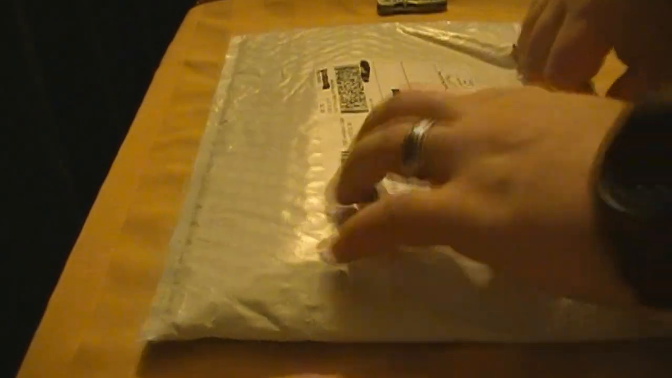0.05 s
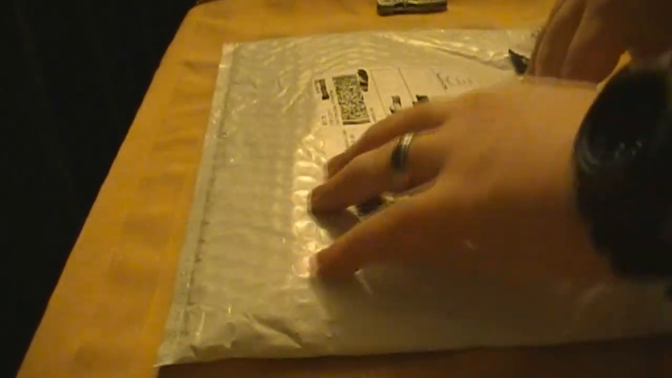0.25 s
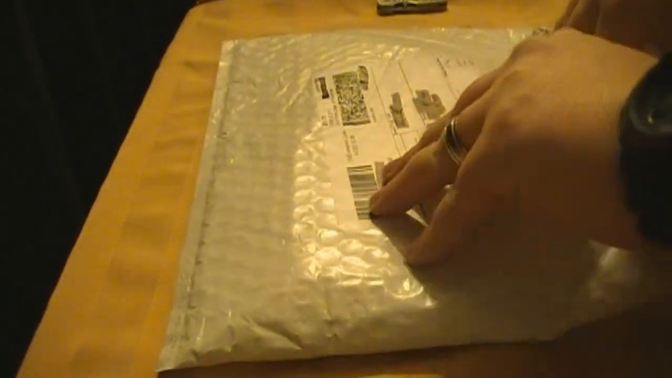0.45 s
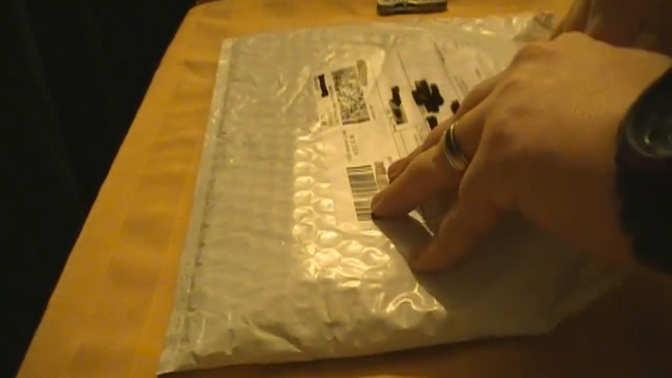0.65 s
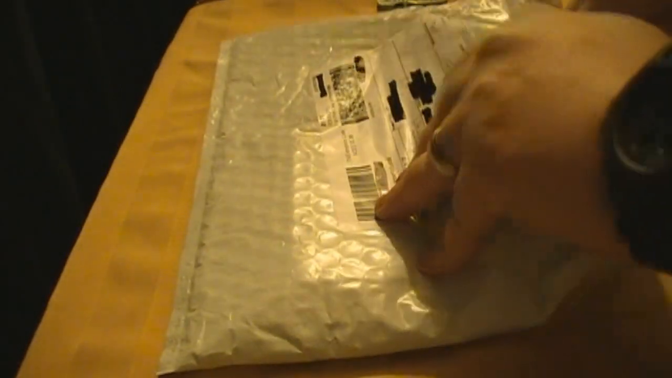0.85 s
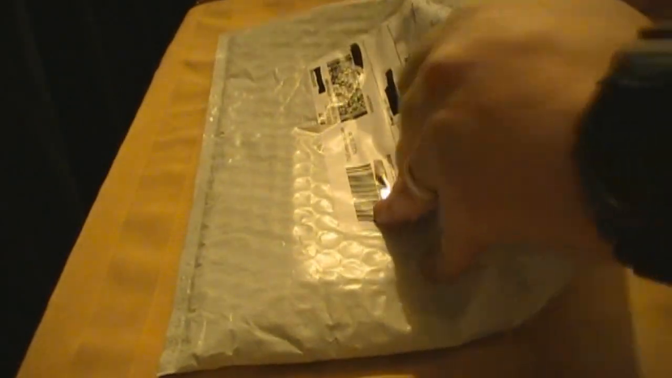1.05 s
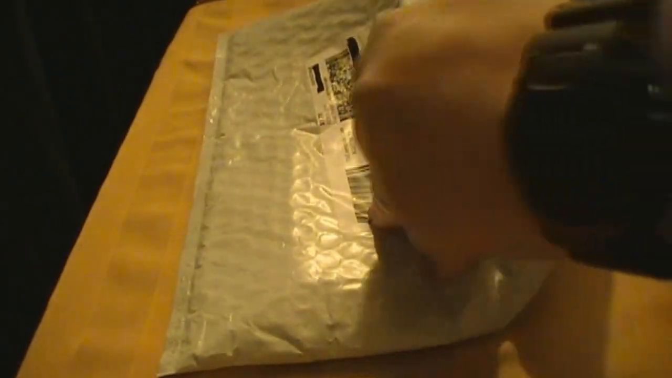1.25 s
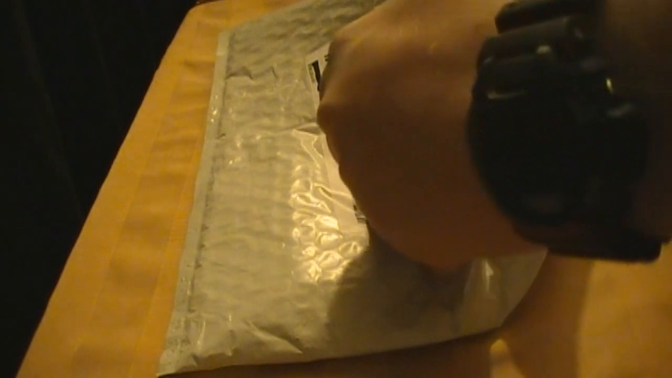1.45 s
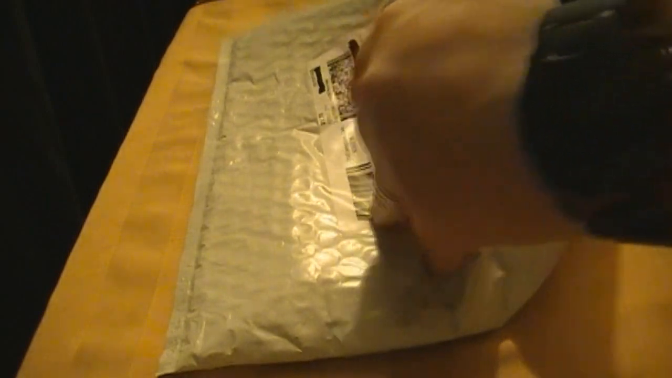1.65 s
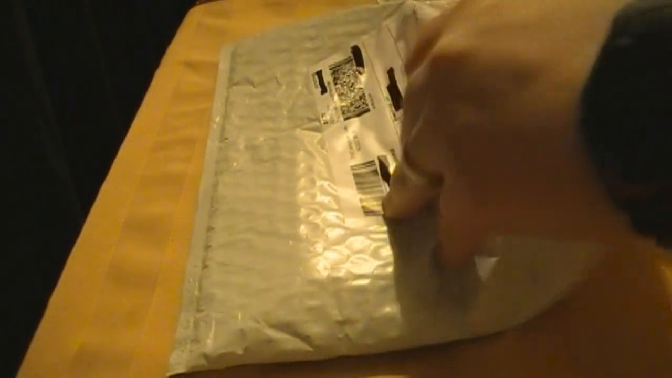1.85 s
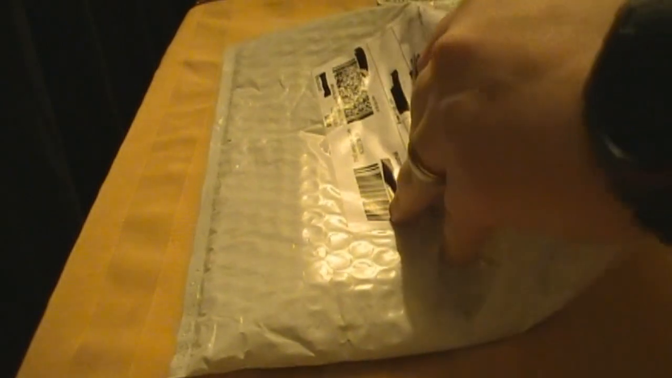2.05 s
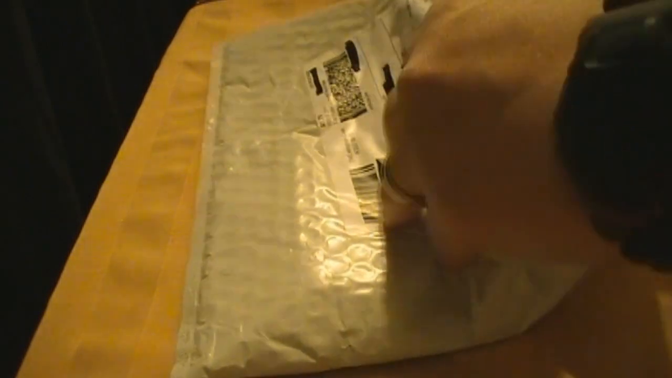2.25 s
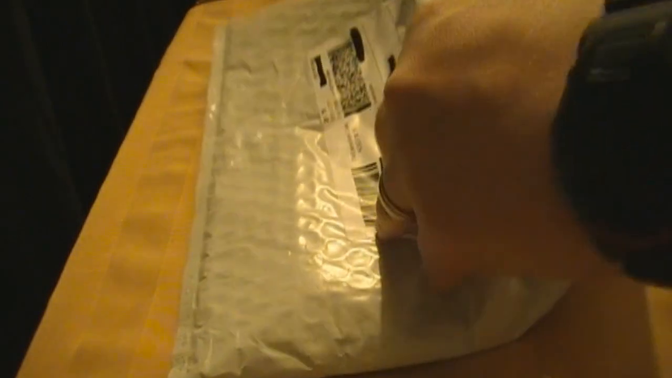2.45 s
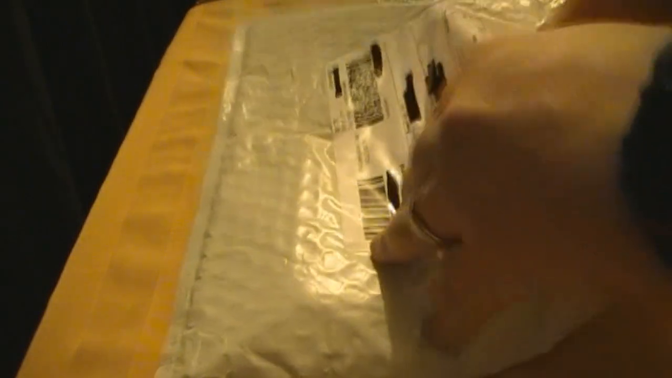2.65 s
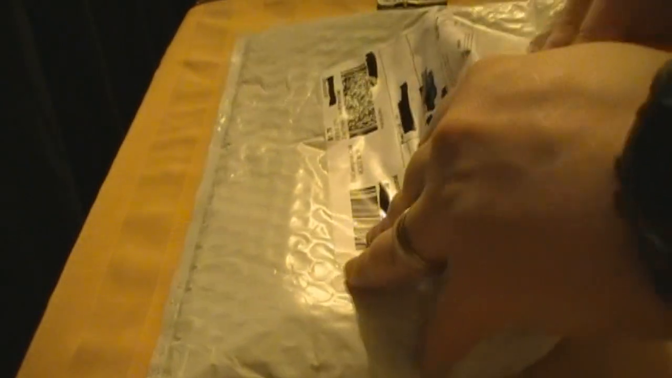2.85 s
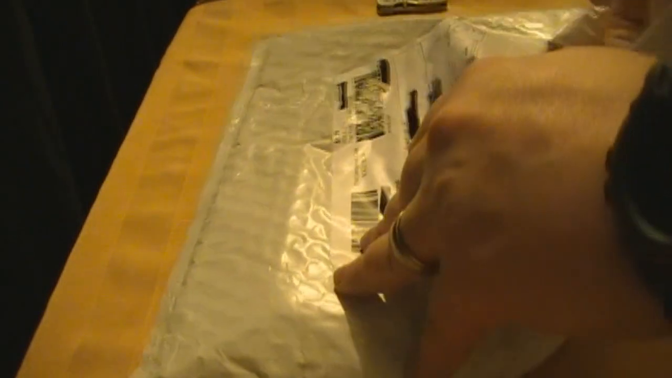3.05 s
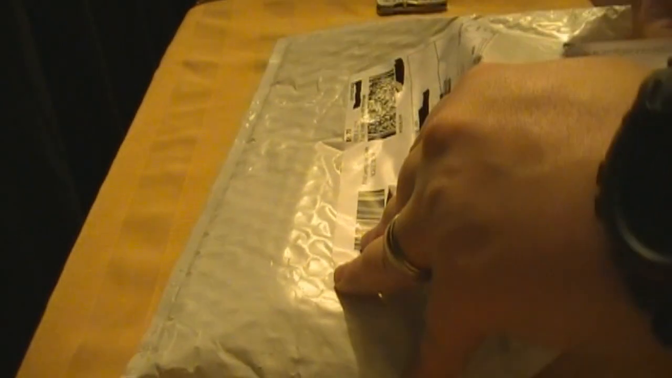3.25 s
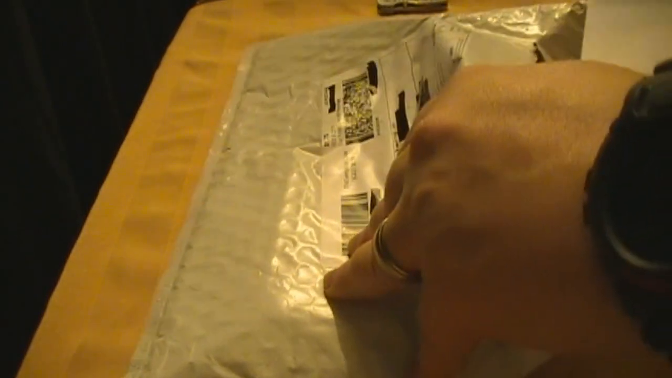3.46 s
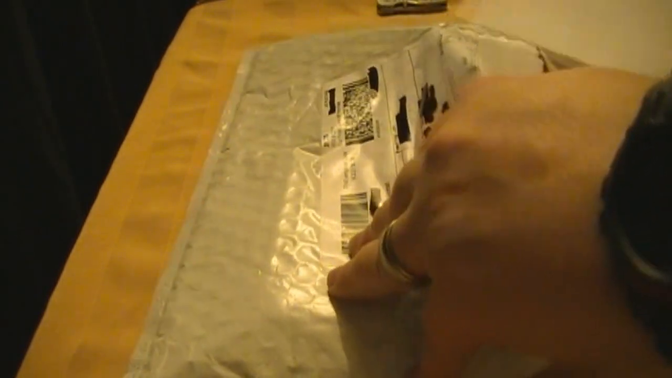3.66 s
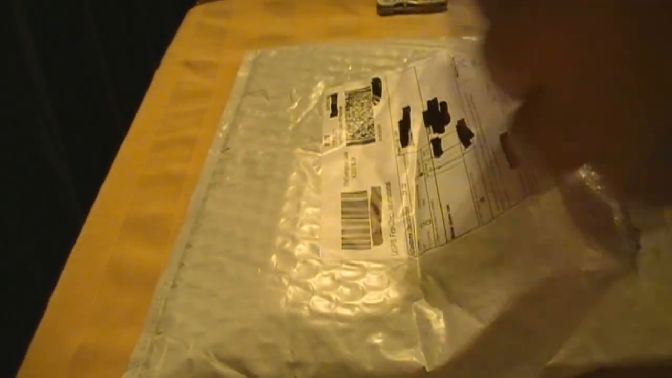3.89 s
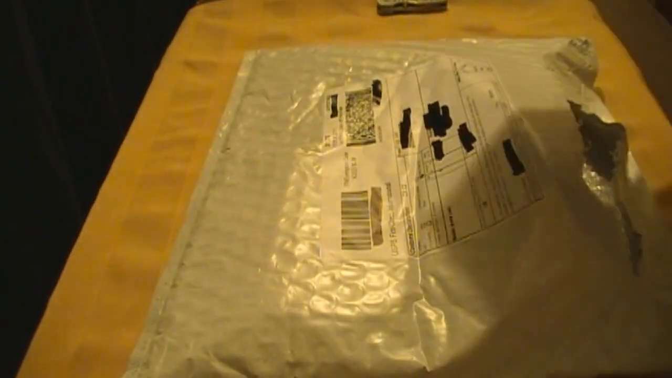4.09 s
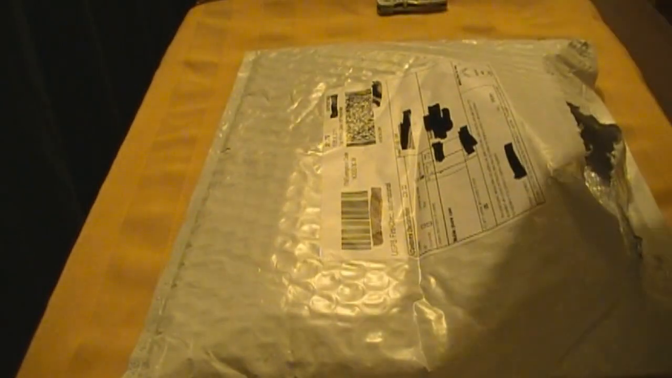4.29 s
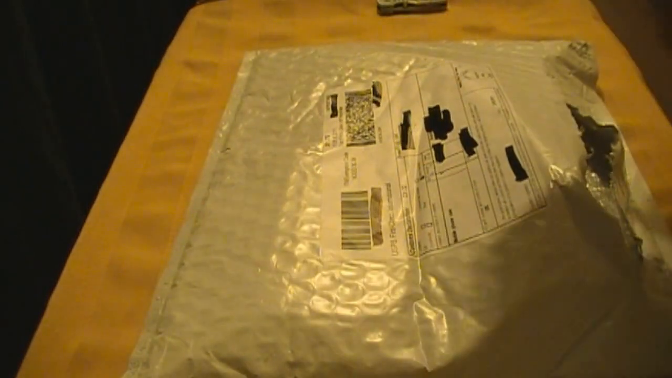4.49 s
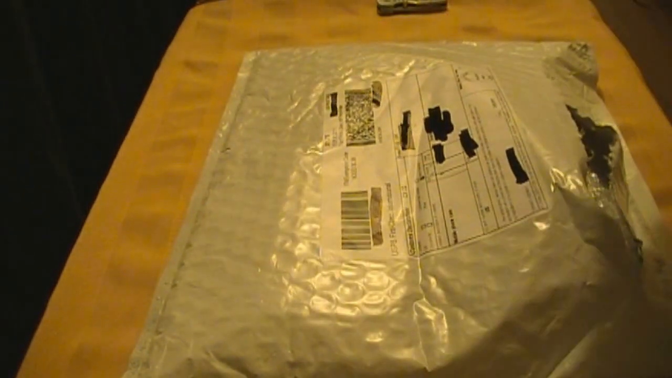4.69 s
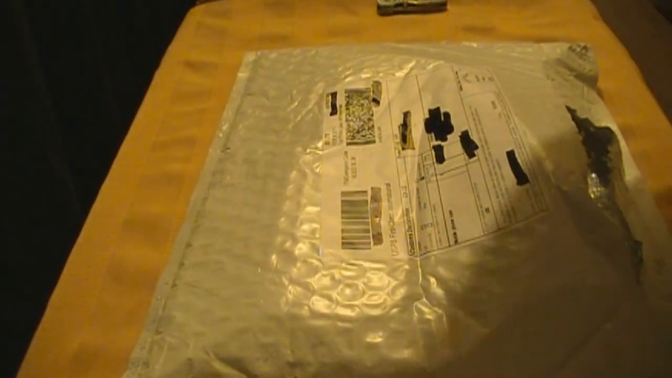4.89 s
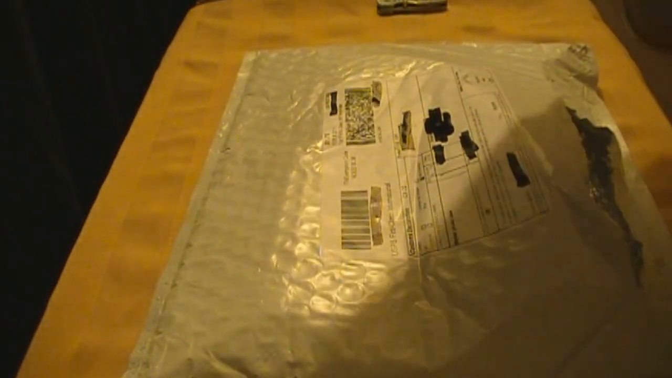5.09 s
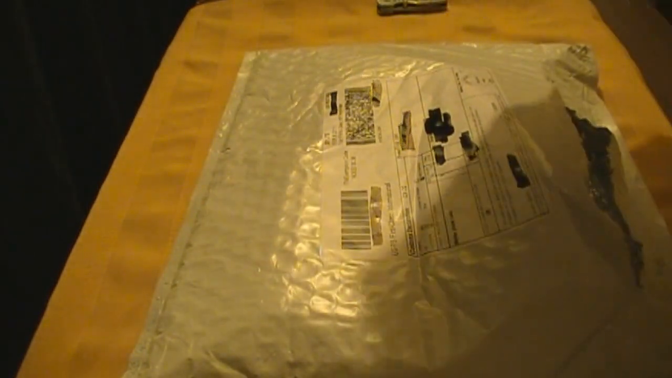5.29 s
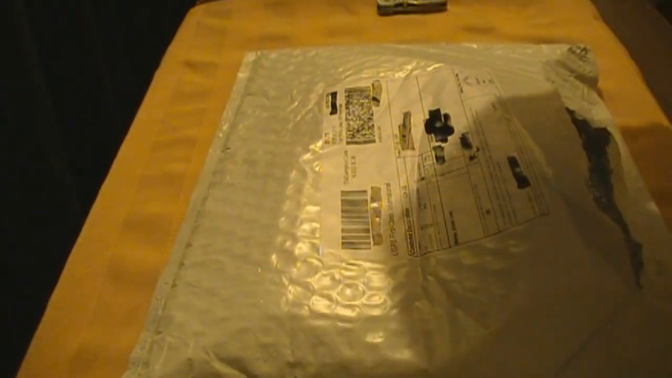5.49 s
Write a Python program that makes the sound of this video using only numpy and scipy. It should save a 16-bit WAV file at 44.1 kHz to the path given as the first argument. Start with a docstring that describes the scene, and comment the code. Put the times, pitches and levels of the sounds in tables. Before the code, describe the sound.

Close to the microphone, hands work open a padded plastic mailer lying on a table. From the start there is light, bright crinkling, then a tight flurry of crisp snaps around 0.25-0.8 seconds, with a very brief lull near 0.57. From about 0.8 to 2 seconds duller pouch thumps and small knocks through the table join the crackle. Between 2.2 and 3.5 seconds it is fullest: hard, sharp pops and longer crunchy crinkles, with tiny bubble pops buried in the uneven clumps. More creases give way towards 4 seconds, and a dense cluster of mid-pitched crackles runs from about 4.05 to 4.4 as the hands let go. After that the film relaxes: softer crackle, sparse faint ticks and thin high clicks until the end at about 5.5 seconds. The room is dry with a short dull tail; faint hiss and low mains hum remain underneath.

```python
"""Creases in the film of a plastic bubble mailer snap through as hands pull it open on a table, near a microphone.
Each snap is a short run of slips that strikes the damped modes of the pouch, its panels and its sharp edges.
Countless small creases crackle in clumps under the hands, with single bubbles popping among them;
from four seconds on, as the hands let go, ticks are fainter and clumps gentler.
The table adds a dull thud and the quiet room a short tail; mains hum and coloured hiss lie below."""
import sys
import numpy as np
from scipy import signal
from scipy.fft import rfft, irfft, next_fast_len
from scipy.io import wavfile
from scipy.ndimage import uniform_filter1d

SR = 44100
rng = np.random.default_rng(int(sys.argv[2]) if len(sys.argv) > 2 else 0)


def to_wav(sig):
    """Store sig (one row per channel, or 1-D mono) as 16-bit WAV at the path in sys.argv[1].

    Samples outside -1..1 are clipped; the rate is SR.
    """
    pcm = np.clip(np.atleast_2d(sig), -1, 1) * 32767
    pcm = np.round(pcm).astype(np.int16)
    wavfile.write(sys.argv[1], SR, pcm.T)  # frames by channels


N = 243991  # samples

POUCH_TOP_HZ, PANEL_HZ, EDGE_LOW_HZ = 850, [680, 6400], 5660
# dB of the buckling patch over the modes of pouch, panel and edge; cycles it takes to fall by 60 dB
PATCH_DB, PATCH_CYCLES = [0.5, -4.5, -8], 9
KNOCK_DB = [2, -9.5, -9]  # first give against the whole run of slips, for pouch, panel and edge

# Resonances of the mailer: closed pouch, film panels, sharp edges.
# Each row: frequency in Hz, relative level in dB, time to decay by 60 dB in seconds.
POUCH_MODES = [(325, 2.5, 0.022), (430, -2.5, 0.045), (527, -6, 0.0038), (690, 13, 0.0052)]
PANEL_MODES = [(800, 18.1, 0.0016), (1420, 21.3, 0.0044), (1930, 16.6, 0.00048), (1900, 20, 0.0057),
               (2700, 29.6, 0.00041), (3980, 14.7, 0.00022)]
EDGE_MODES = [(5070, -0.5, 0.00042), (8200, 2.5, 0.0011), (9530, 2, 0.0032), (10560, 7, 0.0011),
              (10900, -7, 0.0002), (14960, 6.5, 0.0015)]
# Loud creases snapping through. Each row: start in seconds, pouch thump in dB, panel knock in dB,
# sharp edge in dB, nominal length in ms, pitch of the buckling patch in Hz.
CREASE_SNAPS = [(0.075, -58, -30, -45, 1.3, 1400), (0.1022, -55, -33, -23.5, 5.8, 1430),
                (0.1417, -65, -37, -20, 0.56, 1480), (0.237, -54, -31, -50, 8.6, 720),
                (0.2607, -51, -25.5, -27, 6, 1980), (0.281, -54, -26, -16, 1.3, 1700),
                (0.2944, -44, -28, -37, 1.4, 1300), (0.3484, -60, -37, -37, 2.8, 3500),
                (0.362, -62, -19, -19, 0.44, 1450), (0.3779, -60, -45, -21, 0.45, 3500),
                (0.384, -62, -22.5, -21, 0.88, 4000), (0.39, -31, -23, -18, 1.3, 1790),
                (0.411, -53, -22.5, -37, 3.2, 1680), (0.427, -55, -23, -37, 1.1, 2700),
                (0.4434, -35, -18, -37, 2.4, 2270), (0.4477, -55, -28, -15, 2.9, 3000),
                (0.45, -56, -34, -22, 0.45, 1290), (0.497, -30.5, -19.5, -11.5, 0.73, 1320),
                (0.5617, -71, -41, -30, 0.82, 1690), (0.579, -38, -39, -23, 1.2, 2040),
                (0.5918, -43, -23.5, -13, 0.14, 1980), (0.6462, -42, -30.5, -22.5, 1.2, 1700),
                (0.678, -36, -32.5, -23, 3.7, 1310), (0.693, -44, -31.5, -22, 1.8, 1500),
                (0.7094, -68, -35, -20, 0.4, 1800), (0.732, -54, -24.5, -14, 0.19, 2500),
                (0.7884, -25, -42, -22, 2.1, 354), (0.7928, -49, -19, -16, 2.5, 2270),
                (0.815, -53, -27, -15, 0.47, 2060), (0.8666, -62, -52, -22.5, 0.67, 2060),
                (0.942, -28.5, -30.5, -28.5, 5.7, 566), (0.977, -55, -27, -14.5, 0.36, 1850),
                (1.015, -19.5, -21, -28, 1.2, 900), (1.034, -38, -31, -20.5, 0.38, 2200),
                (1.1171, -30, -24, -22, 2.8, 810), (1.1178, -24, -36, -45, 4.5, 350),
                (1.145, -30, -35, -15.5, 1.4, 900), (1.1596, -38, -24, -28, 1.3, 2180),
                (1.175, -28, -41, -50, 20, 700), (1.2034, -29.5, -25, -13.5, 0.5, 4600),
                (1.258, -25.5, -38, -55, 3.3, 1270), (1.3, -29, -24, -28, 1.3, 1660),
                (1.31, -28.5, -53, -18.5, 0.18, 1930), (1.318, -21, -15, -29, 0.14, 1420),
                (1.3253, -57, -38, -17, 0.12, 1690), (1.332, -57, -41, -19, 0.95, 3300),
                (1.373, -39, -31.5, -46, 2.6, 1440), (1.3785, -34.5, -37, -50, 2.7, 735),
                (1.4243, -62, -31.5, -30, 7.1, 1930), (1.484, -57, -48, -23.5, 0.46, 3030),
                (1.5858, -31.5, -23.5, -22, 0.98, 1270), (1.6616, -27, -25, -38, 3.2, 1880),
                (1.6774, -32.5, -29, -28.5, 7.5, 1900), (1.755, -35, -32, -23, 0.47, 2460),
                (1.7699, -28, -26.5, -30, 9, 1540), (1.8013, -29, -42, -53, 2.1, 810),
                (1.844, -26.5, -26, -57, 3.6, 2140), (2.052, -31, -21.5, -29, 12, 2100),
                (2.1656, -31.5, -20.5, -29, 3.4, 1940), (2.2592, -45, -31, -21, 0.71, 900),
                (2.264, -34.5, -15, -31, 1.4, 1490), (2.3406, -57, -20.5, -48, 2.6, 1550),
                (2.355, -32, -48, -13.5, 0.32, 1130), (2.4, -46, -32, -31, 1.7, 2500),
                (2.449, -18.5, -15.5, -15, 0.58, 640), (2.4789, -52, -20, -15, 0.99, 2500),
                (2.517, -40, -22.5, -24, 9.4, 3900), (2.577, -50, -24, -22, 1.8, 1620),
                (2.5926, -21, -17.5, -14.5, 1.7, 690), (2.598, -31, -23, -36, 9.7, 3800),
                (2.604, -36, -37, -13, 1.7, 1800), (2.623, -18.5, -18, -17.5, 6.4, 560),
                (2.674, -31, -16.5, -14, 0.17, 1380), (2.6999, -58, -25, -49, 0.23, 1370),
                (2.72, -29, -51, -50, 1.9, 765), (2.7984, -61, -16.5, -10, 0.42, 1370),
                (2.8188, -41, -29.5, -29, 13, 1570), (2.837, -56, -36, -32, 5.5, 1600),
                (2.908, -63, -38, -25, 0.47, 2060), (2.9355, -52, -30.5, -54, 0.62, 1370),
                (2.985, -24.5, -19.5, -16, 1.6, 680), (3.005, -39, -24, -45, 12.4, 880),
                (3.04, -29.5, -33, -38, 33, 990), (3.1223, -32, -24.5, -48, 4.6, 1530),
                (3.199, -48, -18.5, -11, 0.21, 1420), (3.205, -52, -20.5, -15.5, 4.1, 2050),
                (3.313, -34, -33.5, -35, 22, 1480), (3.347, -21.5, -22, -22, 8.7, 790),
                (3.3496, -16, -24, -34, 11.6, 370), (3.365, -32, -23.5, -33, 20, 3130),
                (3.377, -27, -19.5, -30, 5.7, 1950), (3.386, -33, -25.5, -50, 12, 826),
                (3.4634, -56, -17.5, -18, 0.27, 1930), (3.466, -44, -21.5, -29, 4.4, 3140),
                (3.6858, -29, -35, -40, 4.8, 390), (3.688, -29, -26, -29, 6, 795),
                (3.6964, -55, -27, -20, 1.2, 3980), (3.7267, -48, -29.5, -24, 1.3, 1900),
                (3.7489, -29, -28, -25, 6.2, 755), (3.792, -30, -23.5, -20, 0.62, 1350),
                (3.8888, -44, -29.5, -48, 1.4, 1250), (3.934, -34.5, -20.5, -19, 1.5, 2050),
                (3.991, -59, -42, -31, 12, 1210), (4.064, -22.5, -26, -42, 6.1, 430),
                (4.07, -33, -23, -27, 4, 1910), (4.0821, -32.5, -23, -42, 4.2, 2580),
                (4.105, -31, -30, -47, 6.1, 564), (4.113, -26, -29, -26, 4.6, 400),
                (4.1274, -36, -25, -34, 3.2, 1720), (4.138, -41, -18, -20.5, 2, 1760),
                (4.142, -26, -21, -44, 14.6, 1910), (4.175, -33, -33, -47, 15, 595),
                (4.201, -25.5, -25.5, -47, 12, 2400), (4.256, -42, -32, -43, 1.3, 1580),
                (4.2622, -48, -26, -29, 2.5, 1390), (4.2732, -57, -19, -27, 6, 1740),
                (4.327, -52, -38, -16, 8, 4140), (4.3354, -54, -28, -14, 2.3, 3820),
                (4.3413, -57, -19.5, -27, 5.7, 2870), (4.3569, -34, -21, -35, 1.8, 1830),
                (4.36, -37, -24.5, -47, 18.5, 1600), (4.372, -36, -33, -49, 3.3, 2200),
                (4.419, -38, -42.5, -52, 2, 1930), (4.447, -63, -63, -36, 0.61, 3500),
                (4.489, -42, -60, -55, 9.6, 560), (4.546, -64, -43, -37, 12, 3660),
                (4.632, -59, -45, -55, 2, 1300), (4.714, -40, -38.5, -41, 1.8, 1490),
                (4.7373, -44, -37, -28.5, 3.6, 3530), (4.7457, -54, -32.5, -54, 4.6, 1290),
                (4.759, -70, -60, -35, 0.37, 10500), (4.883, -64, -46, -45, 10, 3500),
                (4.905, -66, -49, -52, 9.6, 2100), (4.956, -70, -65, -32.5, 0.4, 10000),
                (4.974, -39.5, -54, -61, 15, 340), (5.072, -70, -39, -30.5, 0.63, 1970),
                (5.134, -49, -51, -60, 1.4, 900), (5.2701, -70, -70, -41, 0.59, 9600),
                (5.284, -70, -68, -35, 0.42, 10000), (5.289, -70, -66, -33, 0.82, 8500),
                (5.3504, -68, -68, -35, 0.18, 10500), (5.385, -69, -53, -64, 23, 1200),
                (5.454, -57, -41.5, -42, 3.6, 1820), (5.486, -65, -43, -36.5, 6.8, 2040),
                (5.4925, -65, -55, -28.5, 0.91, 1930)]


def snaps(spread_db, octave_db, rough_db, fade, rise, settle_db, settle_ms, strain_ms):
    """Snap-through buckling: a run of uneven slips swells, dies away and drives each mode with its own strength."""
    start_s, *levels, length_ms, patch_hz = np.transpose(CREASE_SNAPS)
    lead, grain = 400, 24  # samples before the snap, samples in a slip
    ms = (np.arange(2400) - lead) / SR * 1000
    through = fade * np.maximum(ms, 0) / np.clip(length_ms, .2, 20)[:, None]
    # the film strains faintly before it gives way and settles in small slips afterwards
    around = from_db(settle_db) * np.exp(-np.where(ms < 0, -ms / strain_ms, ms / settle_ms))
    around = around * np.sqrt(np.clip(length_ms / 4, 0, 1))[:, None]
    swell = through ** rise * np.exp(1 - through) + around
    out = np.zeros(N + len(ms))
    # a thump carries no treble, a panel knock stays in the middle, a sharp edge has no bass
    reach = [(POUCH_TOP_HZ, "low"), (PANEL_HZ, "band"), (EDGE_LOW_HZ, "high")]
    parts = zip((POUCH_MODES, PANEL_MODES, EDGE_MODES), levels, reach, PATCH_DB, KNOCK_DB)
    for modes, level_db, limit, patch_db, knock_db in parts:
        slips = swell * rng.standard_normal(swell.shape)
        slip_sizes = rng.standard_normal((len(start_s), len(ms) // grain))
        slips *= from_db(rough_db * np.repeat(slip_sizes, grain, axis=1))
        # the first give is a single strong click
        slips[:, lead] += from_db(knock_db) * np.sqrt(np.sum(slips ** 2, axis=1))
        # modes near the pitch of the buckling patch are driven hardest
        nearest_hz = np.minimum(patch_hz, modes[-1][0])[:, None]
        octaves = np.minimum(abs(np.log2(np.array(modes)[:, 0] / nearest_hz)), 1)
        strengths = from_db(spread_db * rng.standard_normal(octaves.shape) - octave_db * octaves)
        bursts = 0
        for k, (hz, db, t60) in enumerate(modes):
            bursts = bursts + strengths[:, [k]] * from_db(db) * ring(slips, hz, t60)
        patch = np.array([ring(slip, hz, PATCH_CYCLES / hz) for slip, hz in zip(slips, patch_hz)])
        patch = from_db(patch_db) * patch / patch.std(axis=1)[:, None]
        bursts = bursts / bursts.std(axis=1)[:, None] + patch
        bursts = signal.lfilter(*signal.butter(2, *limit, fs=SR), bursts)
        # set each burst by its loudest short stretch
        tops = np.sqrt(2 * uniform_filter1d(bursts ** 2, size=60, axis=1).max(axis=1))
        bursts = bursts * (from_db(level_db) / tops)[:, None]
        for at, burst in zip((start_s * SR).astype(int), bursts):
            out[at:at + len(ms)] += burst
    return out[lead:N + lead]


# once the hands let go the film relaxes with fainter ticks and gentler clumps
LET_GO_S, LET_GO_DB = 4, -12
# a loud crease stirs up the film around it: crackle swells before it and dies after it
STIR_LOW_DB, STIR_BRIGHT_DB, STIR_RISE_S, STIR_FALL_S = -13.5, -12, 0.0097, 0.015

# Crackle under the hands, gliding between rows.
# Each row: time in seconds, low crackle in dB, bright crackle in dB, before stirring is added.
HAND_CRACKLE = [(0.0, -44.5, -34.5), (0.13, -47.5, -39.5), (0.2, -51.5, -41.5), (0.27, -40.5, -36),
                (0.45, -53.5, -33.5), (0.57, -68, -54), (0.72, -54, -42), (1.09, -47.5, -44),
                (1.16, -52, -45), (1.44, -45, -37.5), (1.54, -52, -49), (1.7, -42.5, -42),
                (1.82, -47, -51.5), (1.89, -40.5, -36.5), (2.22, -44.5, -47), (2.66, -45, -41.5),
                (2.89, -48.5, -47), (3.2, -43, -38), (3.29, -46, -46), (3.5, -51, -57), (3.72, -46, -37.5),
                (3.99, -51, -47.5), (4.055, -57, -39), (4.24, -45.5, -57), (4.45, -50, -48),
                (4.58, -55.5, -40.5), (4.7, -52, -53), (4.81, -57.5, -49), (4.9, -52.5, -41),
                (4.98, -58, -52), (5.1, -60, -46), (5.22, -61, -56), (5.53, -59, -65)]
# The pouch joins in the low crackle as the hand presses down on it.
# Each row: time in seconds, gain of the lowest part of that crackle in dB.
POUCH_GAIN = [(0.5, -14), (1.15, 0.5), (4.4, 3.5)]


def handling():
    """Intermittent (jerky) crackling noise: low and bright crackle share clumps as the film gives way."""
    time_s, low_db, bright_db = np.transpose(HAND_CRACKLE)
    _, pouch_db, panel_db, edge_db, *_ = np.transpose(CREASE_SNAPS)
    t = np.arange(N) / SR
    slow_db = 1.65 * drift(17.4) * np.where(t > LET_GO_S, 0.6, 1)
    clumps = from_db(slow_db + 1.4 * drift(440.0))
    ticks = from_db(13.5 + LET_GO_DB * (t > LET_GO_S)) * creases(per_s=160.0, size_db=2.0)
    dull_ticks = from_db(-2.0) * creases(per_s=100., size_db=-3.5)

    low = crackle(POUCH_MODES + PANEL_MODES, clumps, 0.18 * ticks + dull_ticks,
                  per_s=1100., size_db=2.0, patchy_db=5.0, colour_db=3.5)
    low = low + from_db(POPS_DB) * clumps * pops()
    body = signal.sosfilt(signal.butter(2, PANEL_HZ[0], fs=SR, output="sos"), low)
    low = low + (from_db(np.interp(t, *np.transpose(POUCH_GAIN))) - 1) * body

    bright = crackle(EDGE_MODES, clumps, ticks, per_s=6600.0, size_db=4.5, patchy_db=0.5, colour_db=5.0)
    bright = signal.sosfilt(signal.butter(2, EDGE_LOW_HZ, "high", fs=SR, output="sos"), bright)

    strength_db = np.maximum(np.maximum(pouch_db, panel_db), edge_db)
    low_power = from_db(np.interp(t, time_s, low_db)) ** 2 + stirred(strength_db, STIR_LOW_DB)
    bright_power = from_db(np.interp(t, time_s, bright_db)) ** 2 + stirred(strength_db, STIR_BRIGHT_DB)
    return np.sqrt(low_power) * low + np.sqrt(bright_power) * bright


def crackle(modes, clumps, ticks, per_s, size_db, patchy_db, colour_db):
    """Modal excitation by random impulses: each mode has its own creases and its own share of common ticks."""
    out = 0
    for hz, db, t60 in modes:
        clicks = creases(per_s, size_db) + ticks * from_db(colour_db * rng.standard_normal(N))
        out = out + from_db(db + patchy_db * drift(33.7)) * ring(clicks * clumps, hz, t60)
    return rms_one(out)


def creases(per_s, size_db):
    """Random point process: clicks of either sign at chance moments, many small and a few large in dB size."""
    born = rng.random(N) < per_s / SR
    size = from_db(size_db * np.minimum(rng.exponential(1, N), 5))
    return born * size * rng.choice([-1, 1], N)


def stirred(level_db, share_db):
    """Energy sharing: crackle power rises and falls exponentially around each loud crease with its energy."""
    start_s, length_ms = np.transpose(CREASE_SNAPS)[[0, 4]]
    energy = np.full(N, 1e-18)
    crease_energy = from_db(level_db + share_db) ** 2 * length_ms / 1000
    np.add.at(energy, (start_s * SR).astype(int), crease_energy)
    before = signal.lfilter([1], [1, -np.exp(-1 / (STIR_RISE_S * SR))], energy[::-1])[::-1]
    after = signal.lfilter([1], [1, -np.exp(-1 / (STIR_FALL_S * SR))], energy)
    return (before + after - energy) / (STIR_RISE_S + STIR_FALL_S)


# single bubbles of the film give way: rate, pitch range, cycles to fall by 60 dB, level before clumping
POPS_PER_S, POPS_HZ, POPS_CYCLES, POPS_DB = 250., [900, 6500], 2.6, -12


def pops():
    """Impulse response of small resonators: clicks are dealt to sixteen short rings spread in pitch."""
    clicks, dealt = creases(POPS_PER_S, size_db=2.0), rng.integers(0, 16, N)
    out = 0
    for k, hz in enumerate(np.geomspace(*POPS_HZ, 16)):
        out = out + ring(clicks * (dealt == k), hz, POPS_CYCLES / hz) * hz / POPS_HZ[0]
    return rms_one(out)


ROOM_T60_S, ROOM_DB, ROOM_CUT_HZ = 0.13, -19, 2050


def room(x):
    """Reverberation: convolution with a dull, exponentially decaying tail of dense echoes after a short gap."""
    t = np.arange(SR // 3) / SR
    tail = rng.standard_normal(len(t)) * from_db(-60 * t / ROOM_T60_S) * (t > .003)
    tail = signal.lfilter(*signal.butter(1, ROOM_CUT_HZ, fs=SR), tail)
    return from_db(ROOM_DB) * signal.fftconvolve(x, tail / np.sqrt(np.sum(tail ** 2)))[:N]


HISS_DB = -59.5  # rms
HUM_HZ, HUM_DB = 120, -71.5  # mean frequency; rms level about which it wavers

# Spectrum of the room hiss. Each row: frequency in Hz, relative density in dB per Hz.
HISS_SPECTRUM = [(30, -11.5), (120, 1), (210, 3.5), (310, -6.5), (600, -10.5), (1500, -14), (1950, 0.5),
                 (3200, -11), (6400, -14.5), (10000, -17.5), (15000, -6)]


def background():
    """Stationary noise shaped in the spectrum, and a mains hum as a sine wavering in phase and level."""
    size = next_fast_len(N)
    hz, db = np.transpose(HISS_SPECTRUM)
    log_hz = np.log(np.fft.rfftfreq(size, 1 / SR) + 1)
    colour = from_db(np.interp(log_hz, np.log(hz), db))
    hiss = rms_one(irfft(rfft(rng.standard_normal(size)) * colour, size)[:N])
    hum = np.sqrt(2) * np.sin(2 * np.pi * HUM_HZ * np.arange(N) / SR + 0.83 * drift(0.53))
    return from_db(HISS_DB) * hiss + from_db(HUM_DB + 1.8 * drift(2.8)) * hum


def ring(clicks, hz, t60):
    """Damped resonance: a two-pole mode; white noise comes out at much the same level whatever the decay."""
    r, w = from_db(-60 / (t60 * SR)), 2 * np.pi * hz / SR
    driven = signal.lfilter([1, 0, -1], [1, -2 * r * np.cos(w), r * r], clicks + 1e-18)
    return np.sqrt(1 - r) * driven / np.sin(w)


def drift(rate_hz):
    """Slow random modulation: noise through a double one-pole low-pass, run in for a second; rms 1."""
    r = np.exp(-2 * np.pi * rate_hz / SR)
    return rms_one(signal.lfilter([1], [1, -2 * r, r * r], rng.standard_normal(N + SR))[SR:])


def from_db(db):
    """Level to amplitude: 20 dB is a factor of ten."""
    return 10 ** (np.asarray(db) / 20)


def rms_one(x):
    """Normalisation by effective value: scales to unit rms."""
    return x / np.sqrt(np.mean(x ** 2) + 1e-20)


POUCH_LOW_HZ = 295
TABLE_HZ, TABLE_DB = [70, 220], -2.5


def scene():
    """Superposition: mailer, the table under it, the room and the background."""
    film = snaps(spread_db=8.0, octave_db=17.5, rough_db=3.5, fade=3.07, rise=0.59,
                 settle_db=-16.5, settle_ms=8.5, strain_ms=5.5)
    film = film + handling()
    # the small pouch radiates little below its lowest mode; the table top passes on a dull thud
    mailer = signal.sosfilt(signal.butter(3, POUCH_LOW_HZ, "high", fs=SR, output="sos"), film)
    thud = signal.sosfilt(signal.butter(2, TABLE_HZ, "band", fs=SR, output="sos"), film)
    table = from_db(TABLE_DB) * thud
    return (mailer + table + room(mailer) + background())[None]


MIC_PEAK, MIC_TOP_HZ, CUTOFF_HZ = 1.1, 13000, 16400


def record(dry):
    """Saturation and band limiting: the microphone rounds peaks and falls off steeply; then a hard cut."""
    rounded = MIC_PEAK * np.tanh(dry / MIC_PEAK)
    soft = signal.sosfilt(signal.butter(10, MIC_TOP_HZ, fs=SR, output="sos"), rounded)
    return signal.sosfilt(signal.cheby2(12, 70, CUTOFF_HZ, fs=SR, output="sos"), soft)


dry = scene()
out = record(dry)
to_wav(out)
```